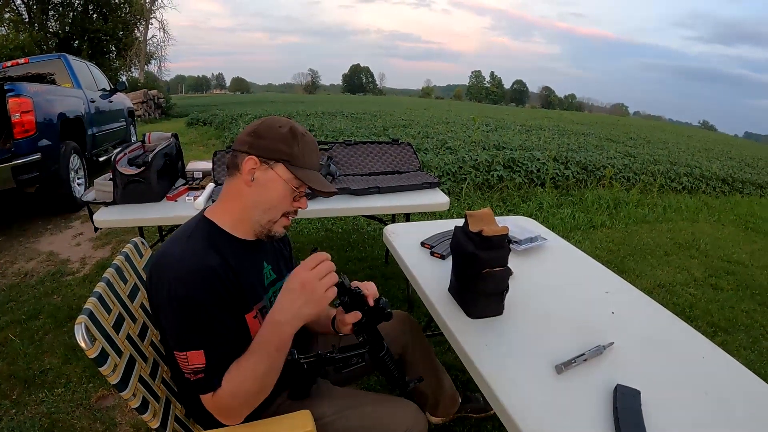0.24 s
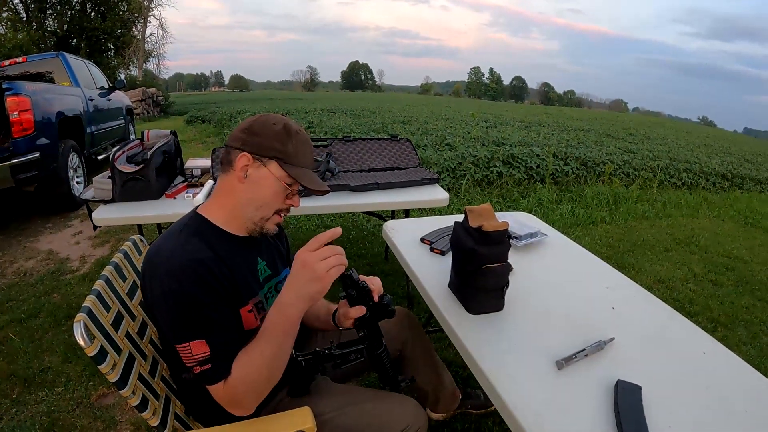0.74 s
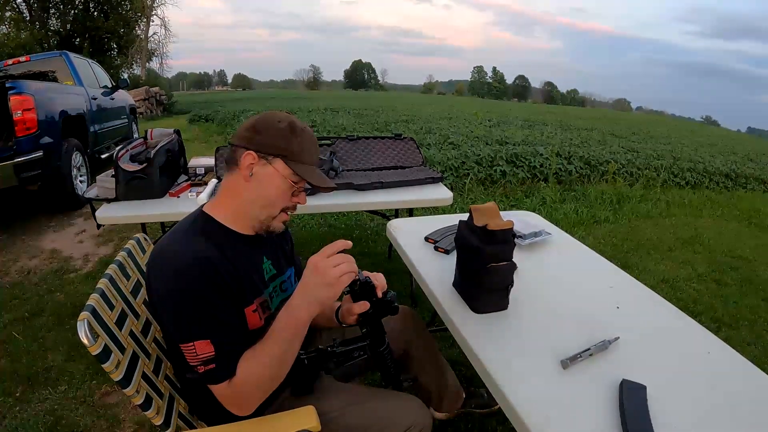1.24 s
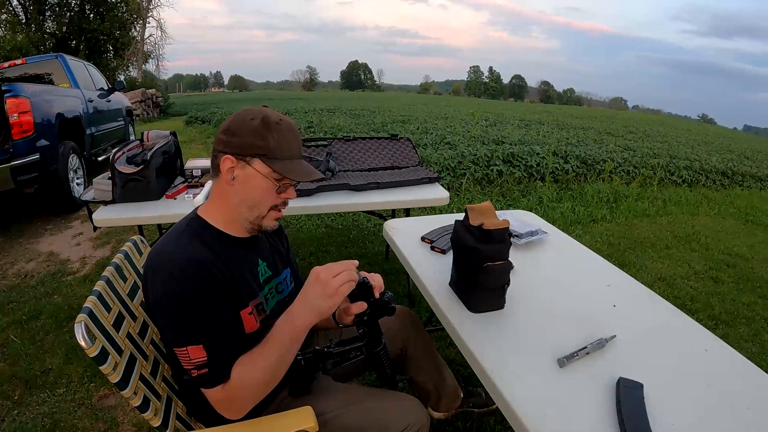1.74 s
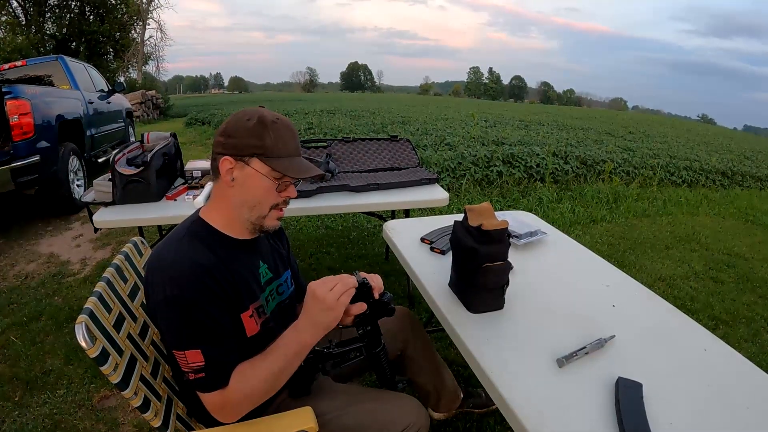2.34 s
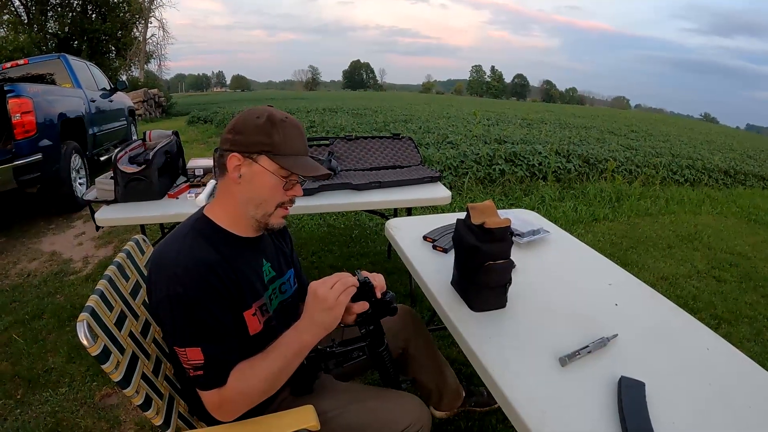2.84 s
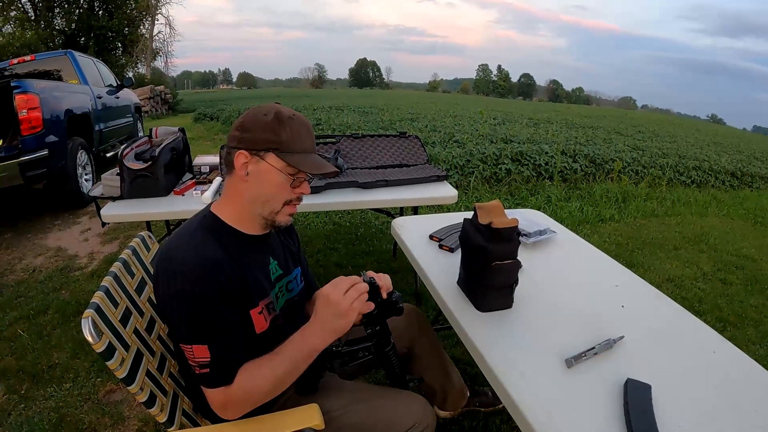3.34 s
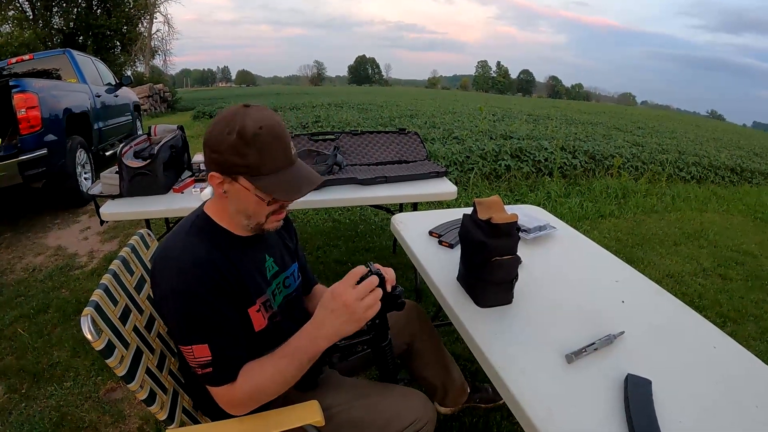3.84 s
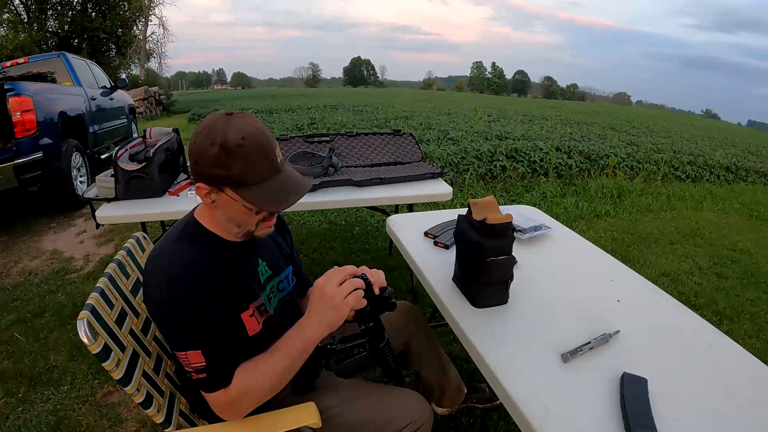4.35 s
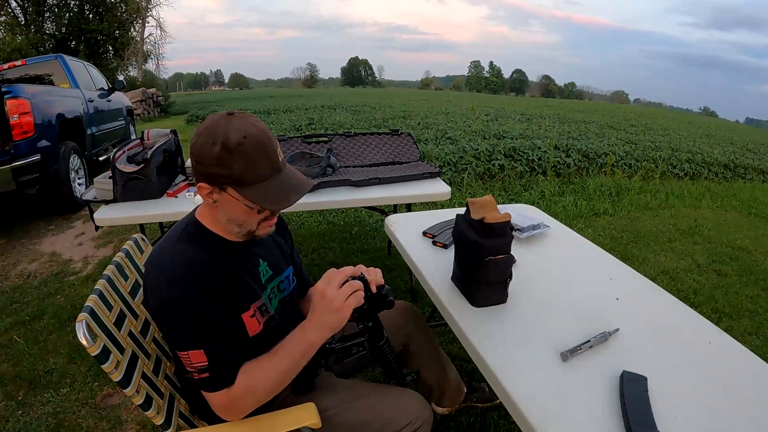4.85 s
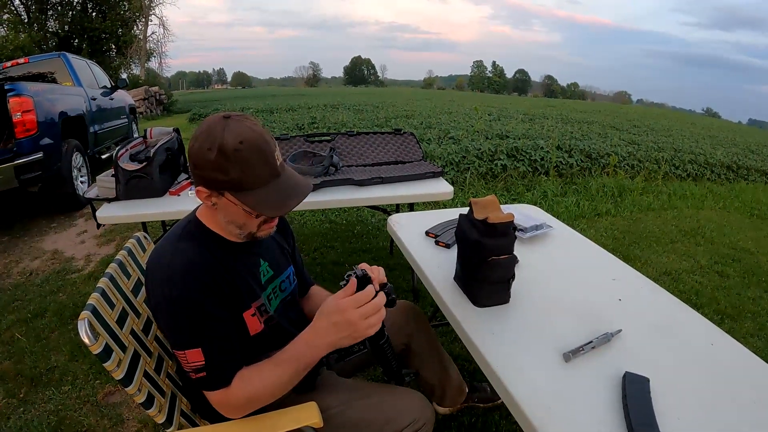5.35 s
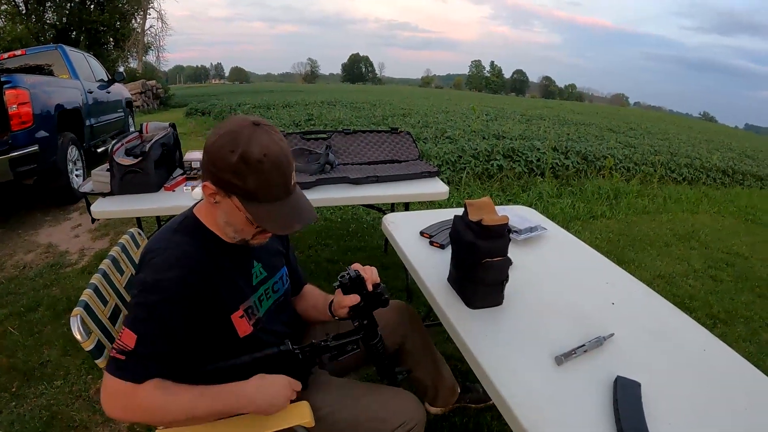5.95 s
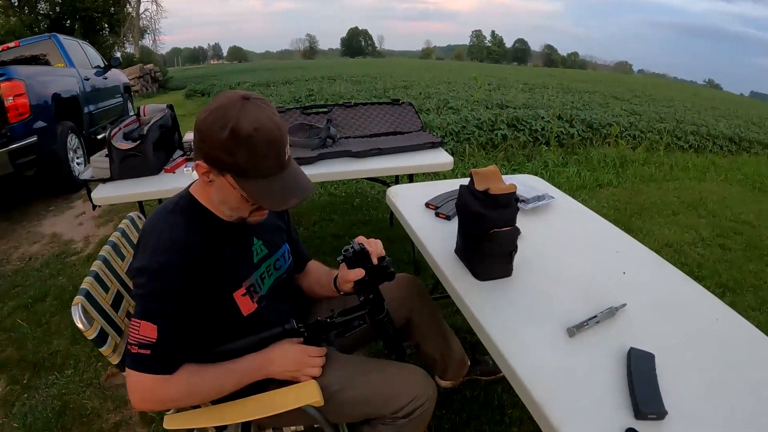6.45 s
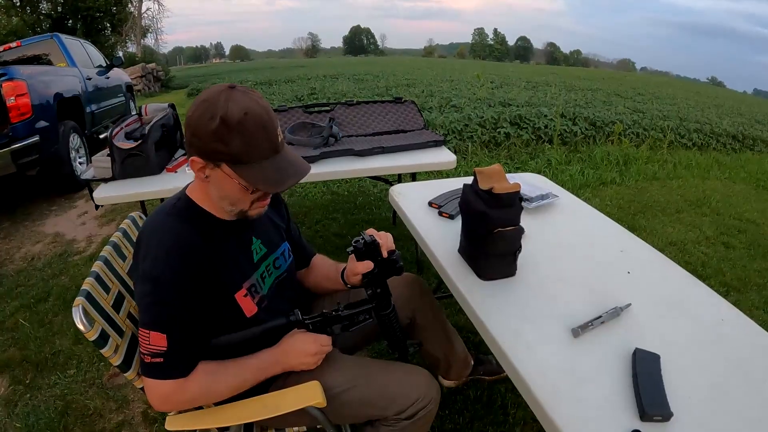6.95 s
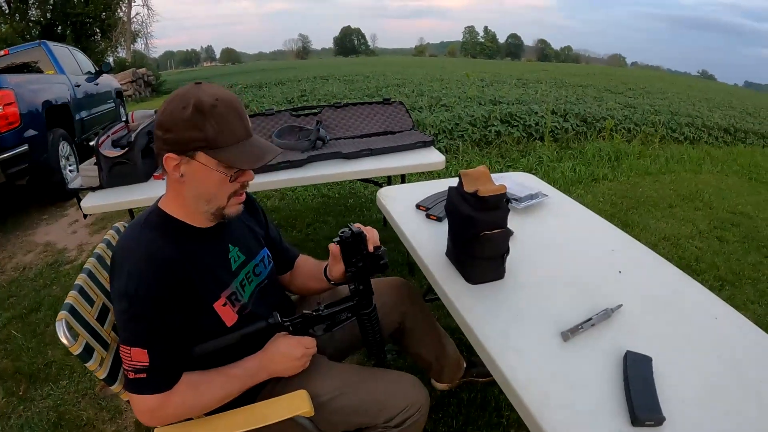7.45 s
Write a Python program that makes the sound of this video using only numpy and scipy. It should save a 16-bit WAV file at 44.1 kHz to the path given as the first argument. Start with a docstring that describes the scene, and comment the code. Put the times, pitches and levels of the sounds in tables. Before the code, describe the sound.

A wavering far engine drone, hissing field and steady insect trill open the scene. After a second, metal clatters briefly and squeaks near the microphone, then slides with dry rasps and small clicks. A much louder steel snap comes well past the middle, ringing for an instant, followed by a little scraping and a few weak ticks. Open air, no room echo, low wind buffeting.

```python
"""Outdoors at dusk: a small engine runs some way off, with wavering low tones and whines. One cricket
trills, another chirps, the field hisses and wind rumbles on the microphones. From about 1 s hands slide
and click steel parts close by: catches and contacts ring damped modes, and one tight fit squeaks.
Near 4.8 s the loudest snap sets a loose pin ringing; small slides and clicks follow to the end."""
import sys
import numpy as np
from scipy import signal
from scipy.fft import rfft, irfft
from scipy.io import wavfile
from scipy.ndimage import minimum_filter1d

SR = 44100
rng = np.random.default_rng(int(sys.argv[2]) if len(sys.argv) > 2 else 0)


def persist_wave(psi):
    """Save psi, clipped to +-1, as 16-bit WAV."""
    counts = np.round(np.clip(psi, -1, 1) * 32767).astype(np.int16)
    wavfile.write(sys.argv[1], SR, np.atleast_2d(counts).T)


N = 339087
TIME = np.arange(N) / SR

# modes of the hand-held steel parts: mode_hz, level_db, t60_s
STEEL = [(840, 4, 0.0063), (1311, 7.5, 0.019), (1680, 6, 0.012), (1750, 7, 0.0068), (2007, 3.5, 0.013),
         (2214, 4, 0.012), (2694, 1, 0.0069), (3160, -13, 0.019), (3254, -6, 0.01486), (3640, 2, 0.012),
         (3924, 7, 0.0043), (4440, 2, 0.013), (5106, 3, 0.0088), (5450, 2.5, 0.015), (5474, 2.5, 0.0062),
         (6430, 1, 0.01213), (6340, 1.5, 0.016), (7030, 1, 0.013), (7720, 4, 0.012), (9220, 1, 0.0047),
         (9790, 3, 0.023), (10990, 3, 0.004), (12500, -2, .004), (14500, -15, 0.0033)]


def amp(db):
    """Decibels to gain."""
    return 10 ** (np.asarray(db) / 20)


def rms_one(x):
    """Scale to rms 1."""
    return x / np.sqrt(np.mean(x ** 2) + 1e-20)


def in_time(rows):
    """Interpolate the columns of a time table, one value a sample."""
    time_s, *columns = np.transpose(rows)
    return [np.interp(TIME, time_s, column) for column in columns]


def at_hz(points, hz):
    """Read a spectrum on a log-frequency axis."""
    points_hz, values = np.transpose(points)
    return np.interp(np.log(hz), np.log(points_hz), values)


def pan(left_minus_right_db):
    """Left and right gains for a level difference."""
    return amp([[left_minus_right_db / 2], [-left_minus_right_db / 2]])


def bandpass(order, low_hz, high_hz):
    """Butterworth band-pass sections."""
    return signal.butter(order, [low_hz, high_hz], "band", fs=SR, output="sos")


def drift(rate_hz):
    """Slow random curve: noise through a double one-pole low-pass, scaled to spread 1."""
    step = 40   # samples between slow values
    r = np.exp(-2 * np.pi * step * rate_hz / SR)
    noise = rng.standard_normal(N // step + 2002)
    slow = signal.lfilter([1], [1, -2 * r, r * r], noise)[2000:]   # skip the filter's start
    return np.interp(np.arange(N) / step, np.arange(len(slow)), rms_one(slow - slow.mean()))


def ring(x, hz, t60_s):
    """Two-pole resonator: a unit click starts a decaying sine of height 1."""
    r, w = amp(-60 / (t60_s * SR)), 2 * np.pi * hz / SR
    return signal.lfilter([0, np.sin(w)], [1, -2 * r * np.cos(w), r * r], x + 1e-18)


def clicks():
    """Each click is a short rattling contact into the steel's modes, plus scatter off table and chair."""
    # clicks: start_s, level_db, then relative levels thud_db (1.3 kHz), knock_db (2 kHz), tap_db (3 kHz),
    # clink_db (5.3 kHz), tick_db (7 kHz), edge_db (10 kHz), and rattle_ms (time to peak contact)
    click_rows = [(1.0402, -32, -15, -3, -2, -9, -9, -19, 0.35),
                  (1.0468, -21, -16, -10, -10, 5, -8, -19, 0.52),
                  (1.0615, -20.5, -25, -24, -10, -13, -16, -28, 0.77),
                  (1.066, -18.5, -4, -13, -16, 4, -8, -34, 0.63),
                  (1.0989, -44, -16, -15, 0, -14, -8, -26, 0.93),
                  (1.268, -47.5, -11, -4, -6, -3, 0, -14, 0.91),
                  (1.3185, -48, -14, -12, -9, -9, -1, -13, 0.97),
                  (1.3434, -53, -1, 2, 0, -9, -15, -23, 0.8), (1.5074, -51, -14, 6, -2, 1, -15, -22, 0.8),
                  (1.9094, -42.5, -13, -3, 3, -9, -7, -13, 0.64),
                  (1.993, -53, -2, 0, -2, -7, -14, -16, 0.67), (2.238, -46.5, 2, -7, 0, 5, -15, -24, 0.37),
                  (2.437, -44.5, -16, -16, -5, -9, 5, -15, 0.99),
                  (2.4806, -27.5, -11, -16, -7, 0, -0.5, -11, 0.44),
                  (3.1024, -26, -3.5, -5.5, 0.5, -5, 7.5, -12, 0.27),
                  (4.755, -7, -19, -1, -7, -6.5, -2, -13.5, 0.36),
                  (4.865, -48, -14, -8, -12, 8, -4, -17, 0.71),
                  (6.192, -45, -15, -35, 10, -24, -18, -25, 0.86),
                  (6.278, -49, 1, -12, 3, -14, -17.5, -18, 0.8),
                  (6.303, -50, -14, -11, 0, -11, -19, -26, 0.6),
                  (7.3147, -39.5, 9.5, 2.5, 2, -16, -11, -25, 0.89),
                  (7.35, -53, -6, -3, 3, -10, -14, -25, 0.7)]
    out, t = np.zeros((2, N)), np.arange(int(.08 * SR)) / SR
    near = bandpass(3, 1100, 5000)
    reach = [bandpass(2, hz / 1.25, hz * 1.2) for hz, _, _ in STEEL]
    for start_s, level_db, thud_db, knock_db, tap_db, clink_db, tick_db, edge_db, rattle_ms in click_rows:
        u = t * 1000 / max(rattle_ms, .15)
        hit = np.zeros((2, len(t)))
        low_db = 1.2 * thud_db - 10
        colour = [(850, low_db), (1300, thud_db), (1900, knock_db), (2300, knock_db),
                  (2800, tap_db), (3400, tap_db), (3700, 0), (4500, 0),
                  (5300, clink_db), (7000, tick_db), (10000, edge_db)]
        for (hz, mode_db, t60_s), band in zip(STEEL, reach):
            contact = rng.standard_normal((2, len(t))) * u * np.exp(-u)
            # channels differ more in the treble
            contact[1] = contact[0] + (0.34 + hz / 30000) * contact[1]
            near_pitch = signal.sosfilt(band, contact)   # a mode takes up only what lies near its pitch
            rung = ring(near_pitch, hz, t60_s)
            rung = np.roll(rung, int(1.5 * SR / hz), axis=1)   # low modes start later
            mode_gain = amp(mode_db + at_hz(colour, hz) - 5.5)
            hit += mode_gain * rung / np.abs(rung).max(axis=1, keepdims=True)
        scatter = signal.sosfilt(near, rng.standard_normal((2, len(t)))) * np.exp(-t / 0.037)
        scatter *= np.clip((.045 - t) / 0.021, 0, 1)   # nothing reflects from further off
        # hard blows shake more of the surroundings
        hit += amp(-5.0 + 0.21 * level_db) * scatter / np.abs(scatter).max()
        at = int(start_s * SR)
        out[:, at:at + len(t)] += amp(level_db) * hit
    return signal.sosfilt(signal.butter(2, 600, "high", fs=SR, output="sos"), out) * pan(0.72)


def pin():
    """A loose pin rings in two modes after a hard snap until the fingers close on it."""
    # free modes: mode_hz, t60_s
    pin_modes = [(3698, 0.86), (4646, 0.7)]
    # pin set ringing: start_s, mode_1_db, mode_2_db
    pin_rows = [(3.1, -70, -52), (4.755, -30, -38)]
    out, t = np.zeros(N), np.arange(int(.12 * SR)) / SR
    freed = np.clip(t / 0.006, 0, 1)   # it comes free a moment after the blow
    caught = np.clip((.112 - t) / 0.056, 0, 1)
    for start_s, *levels_db in pin_rows:
        tone = sum(amp(db) * ring(t == 0, hz, t60_s) for db, (hz, t60_s) in zip(levels_db, pin_modes))
        at = int(start_s * SR)
        out[at:at + len(t)] += tone * freed * caught
    return out * pan(3.2)


def stroke(peak_s, build_s, release_s):
    """Pressure of one stroke: it gathers, peaks and lets go."""
    rising = np.clip(1 + (TIME - peak_s) / build_s, 0, 1) ** 0.87
    return rising * np.clip(1 - (TIME - peak_s) / release_s, 0, 1) ** 1.05


def sliding():
    """Dense uneven surface catches excite the grip-damped steel; each stroke rasps at its own pitch."""
    # strokes: peak_s, build_s, release_s, level_db, rasp_hz,
    # then relative levels rasp_db, scratch_db (5 kHz), treble_db
    stroke_rows = [(1.047, 0.077, 0.024, -42.5, 2840, -18, 1, -6),
                   (1.066, 0.011, 0.018, -28.5, 3900, -6, -2.5, -36),
                   (1.108, 0.024, 0.031, -46.5, 4070, -2, -11, -24),
                   (1.15, 0.037, 0.021, -51, 2100, -7, -4, -18), (1.27, .03, .03, -60, 2900, -6, -2, -12),
                   (1.33, 0.053, .06, -57, 2870, -8, -3, -13),
                   (1.55, 0.054, 0.085, -47.5, 4100, -0.5, -10, -25),
                   (1.63, 0.05, 0.12, -49.5, 2600, -2.5, -7, -26),
                   (1.732, 0.027, 0.094, -45.5, 3930, -4, -4.5, -25),
                   (1.91, .13, 0.021, -47, 1940, -3, -4, -23), (1.96, .02, 0.032, -56, 2950, -3, -4, -16),
                   (2.06, .08, 0.065, -47.5, 2940, -6, -10.5, -18),
                   (2.24, 0.046, .03, -57.5, 3520, -10, 3, -22), (2.42, 0.04, .05, -48, 4500, -7, -4, -16),
                   (2.478, 0.046, 0.021, -42, 4450, -5, -0.5, 2),
                   (4.905, 0.054, 0.054, -51.5, 2100, -3.5, -7, -19),
                   (5.27, .03, .07, -66, 4000, -2, -1, 0.5), (6.28, 0.047, 0.064, -58.5, 3450, -5, -13, -9)]
    catches_per_s, rasp_t60_s = 6000, .0035
    sizes = amp(3.6 * np.minimum(rng.exponential(1, (2, N)), 4)) * rng.choice([-1, 1], (2, N))
    catches = sizes * (rng.random((2, N)) < catches_per_s / SR) * amp(0.88 * drift(60))
    catches[1] = 0.81 * catches[0] + 0.58 * catches[1]   # channels partly alike
    levels, rasp = np.zeros((3, N)), np.zeros((2, N))
    for peak_s, build_s, release_s, level_db, rasp_hz, rasp_db, scratch_db, treble_db in stroke_rows:
        pressure = stroke(peak_s, build_s, release_s)
        levels += pressure * amp([[level_db], [level_db + scratch_db], [level_db + treble_db]])
        rasp += pressure * amp(level_db + rasp_db) * rms_one(ring(catches, rasp_hz, rasp_t60_s))
    groups = np.zeros((3, 2, N))   # low, scratch, treble
    for k, (hz, mode_db, t60_s) in enumerate(STEEL[:-2]):
        grip = amp(mode_db + 2.0 * drift(22))   # the grip shifts, and with it the modes that speak
        rung = rms_one(ring(catches, hz, .3 * t60_s))
        groups[int(hz > 4300) + int(hz > 6500)] += grip * rung * (-1) ** k
    grit = signal.sosfilt(bandpass(1, 5000, 8000), catches)
    groups[2] = 0.25 * rms_one(groups[2]) + 1.9 * rms_one(grit)   # bare catches heard in the treble
    sound = rasp + sum(level * rms_one(group) for level, group in zip(levels, groups))
    return signal.sosfilt(bandpass(3, 1400, 12000), sound) * pan(0.75)


def squeak():
    """A tight fit squeaks as it slides home: uneven stick-slip catches, twice through one resonance."""
    # squeak level: time_s, level_db
    squeak_level = [(0.975, -74), (1.005, -49), (1.045, -35), (1.05, -23), (1.056, -49)]
    squeak_hz, t60_s = 5360, .011
    level_db, = in_time(squeak_level)
    slips = rng.standard_normal(N) * amp(3.4 * drift(150))
    tone = rms_one(ring(ring(slips, squeak_hz, t60_s), squeak_hz, t60_s))
    sounding = (TIME > squeak_level[0][0]) * (TIME < squeak_level[-1][0])
    return sounding * amp(level_db) * tone * pan(.8)


def silencer_phase(orders, level_db):
    """Phase in radians at each order: a causal filter's phase follows from its levels."""
    size = 256
    log_gain = np.interp(np.arange(size // 2 + 1), orders, level_db) * np.log(10) / 20
    cepstrum = irfft(log_gain)[:size // 2] * 2
    return rfft(cepstrum, size).imag


def far_tone(turn, lag, engine_hz):
    """A far low tone slips in phase against the engine's second order and beats with it."""
    # far tone: time_s, pitch_hz, level_db (rms)
    drone = [(0, 62.8, -52), (.7, 63.2, -52), (1.5, 62.7, -50), (2, 63.9, -49.5), (3, 63.23, -50),
             (4, 64.01, -48.5), (4.7, 64.73, -51.5), (5.1, 58.82, -54), (5.6, 62.28, -52),
             (6.3, 60.17, -48.5), (6.8, 57.07, -62), (7.69, 62, -70)]
    drone_hz, drone_db = in_time(drone)
    slip = 2 * np.pi * np.cumsum(drone_hz - 2 * engine_hz) / SR
    return np.sqrt(2) * amp(drone_db) * np.cos(2 * turn + lag[2] + slip)


def whines(turn):
    """Thin tones locked to high multiples of the engine speed; the two strongest swell."""
    # fainter whines: cycle_multiple, level_db
    faint_whines = [(44, -71), (57, -73), (64, -73)]
    # swelling whines: time_s, order_30_db, order_48_db
    whine_swell = [(0, -64.5, -68), (.45, -75, -70), (1.3, -69, -72), (1.75, -73, -68), (2.25, -69, -66),
                   (2.7, -77, -74), (3.2, -66, -65.5), (3.7, -69, -74), (4.8, -71, -73.5),
                   (5.05, -75.5, -80.5), (6.199, -70, -71), (6.85, -68.5, -71), (7.3, -70, -66),
                   (7.69, -83, -70.5)]
    out = np.zeros(N)
    for order, db in faint_whines:
        out += amp(db + 3 + 3 * drift(1.5)) * np.cos(order * turn + .8 * drift(8))
    for order, db in zip((30, 48), in_time(whine_swell)):
        out += amp(db + 9.0) * np.cos(order * turn + 0.47 * drift(19))
    return out


def engine():
    """One exhaust pulse a cycle through a causal silencer, with the beating far tone and the whines."""
    # exhaust harmonics: cycle_multiple, relative_db
    exhaust = [(1, -11.5), (2, 0), (3, -11.5), (4, -5.5), (5, -0.5), (6, -1.5), (7, -7), (8, -10.5),
               (9, -3.5), (10, -27), (11, -26.5), (12, -20), (13, -17), (14, -43), (15, -36), (16, -29.5)]
    engine_hz, exhaust_db = 31.3, -42.5   # cycles per second, common level
    turn = 2 * np.pi * (engine_hz * TIME + .87 + .02 * drift(.5))
    lag = silencer_phase(*np.transpose(exhaust))
    pulses = np.zeros(N)
    for order, db in exhaust:
        gain_db = exhaust_db + db + .5 * drift(1.9)
        pulses += amp(gain_db) * np.cos(order * turn + lag[int(order)])
    pulses += far_tone(turn, lag, engine_hz)
    return pulses * pan(1.68) + whines(turn) * pan(10.5)


def low_hum():
    """Two low tones with wandering phase waver together in level."""
    # common level: time_s, level_db
    hum_level = [(0, -45), (.7, -84), (.9, -64), (1.5, -61), (1.75, -75), (2.5, -51), (3.1, -57),
                 (3.5, -57), (4.1, -48), (4.85, -63), (5.7, -47.5), (6.5, -65), (7.05, -50.5),
                 (7.69, -58.5)]
    # tones: pitch_hz, relative_db
    hum_tones = [(52, -2), (78, -13.5)]
    level_db, = in_time(hum_level)
    tones = np.zeros(N)
    for hz, tone_db in hum_tones:
        tones += amp(tone_db + 2) * np.cos(2 * np.pi * (hz * TIME + .12 * drift(1.5)))
    return amp(level_db) * tones * pan(0.85)


def wing_stroke(top_hz, fall_hz, length_s):
    """One closing of a cricket's wings: a short tone that slides down."""
    u = np.arange(int(length_s * SR)) / (length_s * SR)
    tone = np.sin(2 * np.pi * np.cumsum(top_hz - fall_hz * u) / SR)
    return np.sin(np.pi * u ** 0.75) ** 2 * tone


def crickets():
    """An unbroken trill of about 70 wing strokes a second, and chirps of three strokes."""
    # chirps: middle_syllable_s, level_db
    chirp_rows = [(-0.0039, -49), (0.5487, -47), (1.1149, -53), (1.7644, -52), (2.2524, -52), (2.7087, -47),
                  (3.2251, -45.5), (3.7798, -48), (4.5087, -46.5), (5.6411, -46.5), (6.3375, -51),
                  (6.9172, -48), (7.5378, -47.5)]
    stroke_hz = 70 * (1 + .03 * drift(1.8) + .06 * drift(30))
    trill_starts = np.diff(np.floor(np.cumsum(stroke_hz) / SR), prepend=0)
    trill_starts *= amp(-57 + 0.4 * drift(6.4) + rng.normal(0, 1.9, N))
    trill = signal.oaconvolve(trill_starts, wing_stroke(5890, 665, 0.01))[:N]
    starts = np.zeros(N)
    for middle_s, level_db in chirp_rows:
        for shift_s, relative_db in [(-.040, -3), (0., 0.), (.042, 0.)]:
            if middle_s + shift_s > 0:
                starts[int((middle_s + shift_s - .004) * SR)] = amp(level_db + relative_db)
    chirp = signal.oaconvolve(starts, wing_stroke(5380, 950, .030))[:N]
    echo = np.roll(chirp, int(.013 * SR)) * .45   # a second path beats with the direct one
    left = chirp + echo
    right = np.roll(left, 3)
    return trill * pan(0.29) + np.array([left, right]) * pan(0.59)


def field():
    """Wind rumble, engine rush and distant insects as narrow bands of stereo noise."""
    # spectrum: band_hz, relative_db (per Hz)
    spectrum = [(25, -10), (40, -8.5), (75, -3.5), (170, -11.5), (330, -18), (600, -29), (800, -36),
                (1000, -21), (1500, -23), (3300, -32.5), (4400, -27.5), (5600, -25), (7500, -44.5),
                (11000, -53.5), (13000, -62), (15500, -75)]
    # swells: time_s, around_1_khz_db, treble_db
    swells = [(0, 2.5, 1.5), (.8, 1, -5.5), (2.6, 1.5, 1), (3.6, 3, 1), (4.5, 1.5, -2), (5.5, 2.5, -1),
              (6, 3.5, -3), (6.5, 0.5, 3.5), (7, 2.5, 5), (7.4, 3.5, -7.5), (7.5, 7.5, -7),
              (7.69, 12.5, -9.5)]
    # left-right likeness: band_hz, correlation (0-1)
    likeness = [(25, 0.91), (60, 1), (180, 0.58), (550, 0.54), (1650, .45), (5000, 0.67), (15000, 0.068)]
    # stereo lean: band_hz, left_minus_right_db
    lean = [(60, -5.5), (150, -3.5), (380, 5), (950, 3.5), (2380, 8.5), (5980, 2.5), (15000, 8)]
    mid_weight = [(300, 0.083), (600, 0.92), (1200, 0.64), (2500, 0.15)]
    treble_weight = [(3000, 0.076), (8000, 0.35)]
    gust_db = [(40, 3.0), (120, 0.35)]   # gusts move the bass most
    mid_swell_db, treble_swell_db = in_time(swells)
    out, edges_hz = 0, 22 * 2 ** np.arange(0, 9.7, .4)
    white, gust = rng.standard_normal((2, 2, N)), drift(1.0)
    for k, (low_hz, high_hz) in enumerate(zip(edges_hz, edges_hz[1:])):
        # neighbouring bands use different noise
        mid, side = signal.sosfilt(bandpass(2, low_hz, high_hz), white[k % 2])
        hz = np.sqrt(low_hz * high_hz)
        alike = np.clip(at_hz(likeness, hz), -1, 1)
        swell_db = at_hz(mid_weight, hz) * mid_swell_db + at_hz(treble_weight, hz) * treble_swell_db
        level_db = at_hz(spectrum, hz) + swell_db + at_hz(gust_db, hz) * gust + 0.66 * drift(9)
        stereo = np.sqrt(1 + alike) * mid + np.sqrt(1 - alike) * side * [[1], [-1]]
        out = out + amp(level_db) * pan(at_hz(lean, hz)) * stereo
    return amp(-49) * rms_one(out)


def wind():
    """Wind on the microphones: lumpy low noise, partly its own in each channel."""
    # wind level: time_s, level_db (rms)
    wind_level = [(0.0, -44), (1.93, -90), (1.97, -47), (3.77, -61), (4.48, -43), (5.01, -49.5), (5.2, -44),
                  (5.35, -53), (7.69, -69)]
    level_db, = in_time(wind_level)
    mid, side = signal.sosfilt(bandpass(2, 22, 48), rng.standard_normal((2, N)))
    return amp(level_db + 0.5 * drift(2.5)) * rms_one(mid + .25 * side * [[1], [-1]])


def scene():
    """Sum of all sources at the microphone pair."""
    steel = clicks() + pin() + sliding() + squeak()
    return steel + engine() + low_hum() + crickets() + field() + wind()


def duck(level_db, limit_db, hold_s, release_db_per_s):
    """Excess over a limit in dB, held, released in a straight line, then smoothed."""
    size = int(hold_s * SR)
    over_db = np.maximum(level_db - limit_db, 0)
    excess_db = -minimum_filter1d(-over_db, size, origin=(size - 1) // 2)
    fall_db = release_db_per_s * TIME
    held_db = np.maximum.accumulate(excess_db + fall_db) - fall_db
    return signal.lfilter([.002], [1, -.998], held_db)


def record(dry):
    """Gain control backs off, briefly (mostly mids) and long (overall); peaks round, the top is cut."""
    level_db = 20 * np.log10(np.abs(dry).max(axis=0) + 1e-9)
    brief_db = duck(level_db, -8.5, 0.075, 400)
    long_db = duck(level_db, -6.0, 0.083, 6.4)
    mids = signal.sosfiltfilt(bandpass(2, 500, 7000), dry)
    ducked = mids * amp(-.85 * brief_db) + (dry - mids) * amp(-.2 * brief_db)
    ducked = ducked * amp(-.35 * long_db)
    rounded = ducked / (1 + np.abs(ducked / .87) ** 6) ** (1 / 6)
    return signal.sosfilt(signal.cheby2(12, 90, 16450, fs=SR, output="sos"), rounded)


dry = scene()
out = record(dry)
persist_wave(out)
```